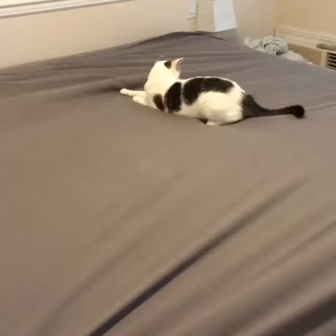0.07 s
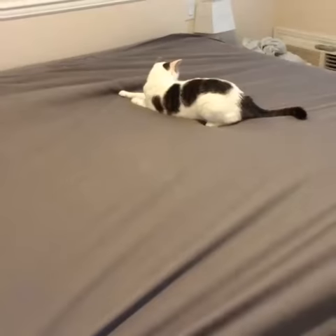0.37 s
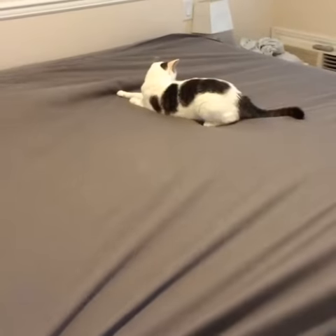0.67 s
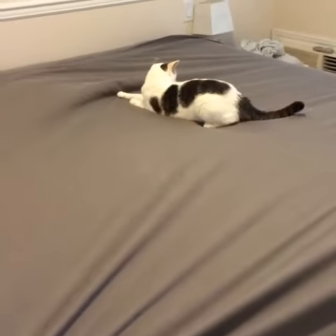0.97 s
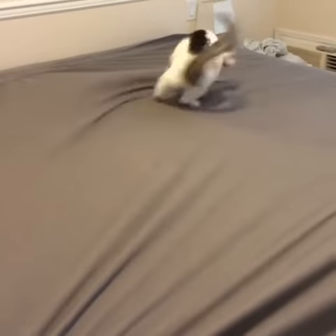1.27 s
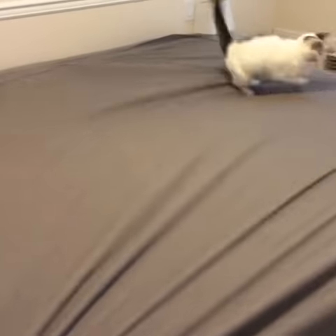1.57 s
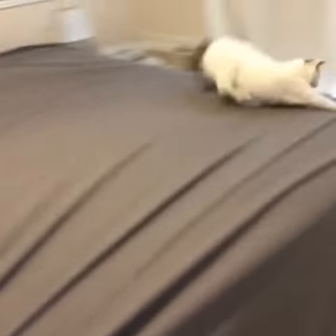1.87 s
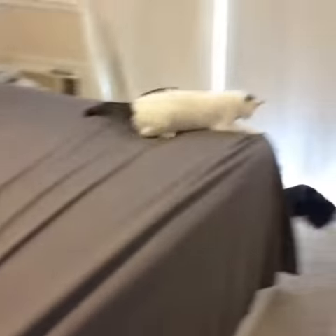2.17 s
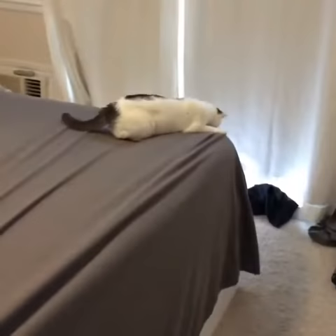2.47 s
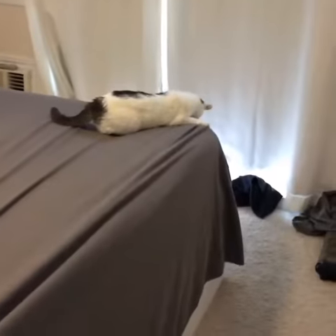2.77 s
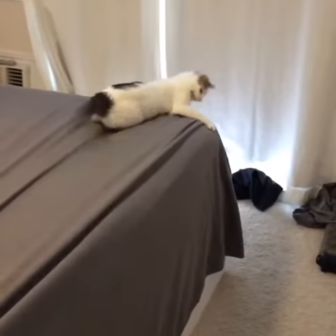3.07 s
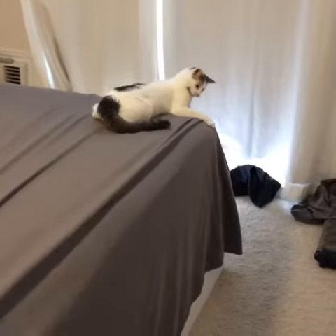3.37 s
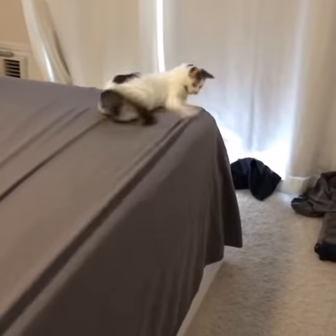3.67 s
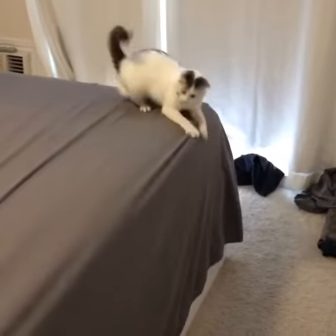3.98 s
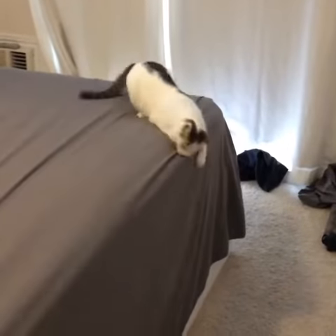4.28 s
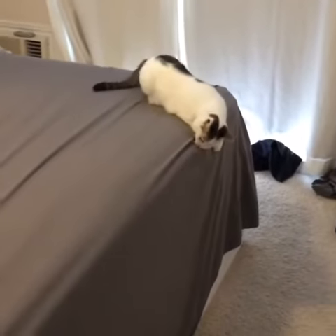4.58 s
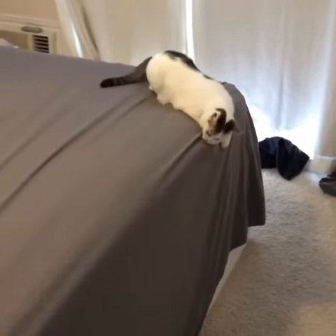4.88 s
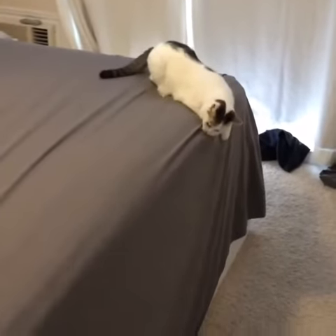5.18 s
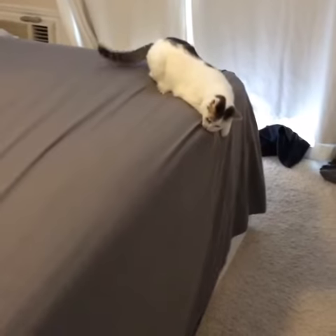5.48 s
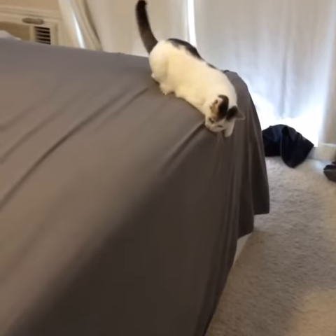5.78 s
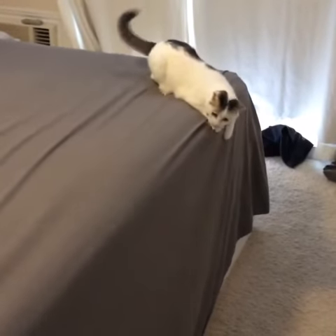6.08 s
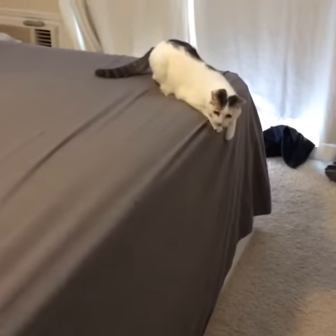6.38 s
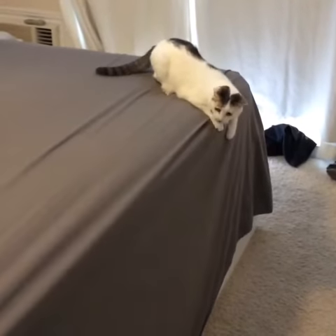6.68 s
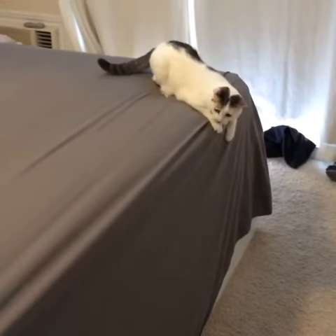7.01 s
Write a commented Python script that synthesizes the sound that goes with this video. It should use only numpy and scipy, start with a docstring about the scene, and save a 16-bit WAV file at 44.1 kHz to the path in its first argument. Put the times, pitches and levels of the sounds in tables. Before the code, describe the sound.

A ventilation fan hums steadily in a bedroom while a cat pounces across a bed with soft thumps and sheet rustles.

```python
"""A ventilation fan hums in a bedroom: motor drone, a wavering blade tone, duct rumble and rushing air.
A cat pounces across the bed; its paws pat the mattress, and fur and claws drag over the sheet.
One hand-held microphone turns from the wall to follow the cat, so the fan's colour shifts;
along the way it picks up a few soft low bumps."""
import sys
import numpy as np
from scipy import signal
from scipy.fft import rfft, irfft
from scipy.io import wavfile

SR = 44100
rng = np.random.default_rng(int(sys.argv[2]) if len(sys.argv) > 2 else 0)


def materialize(psi):
    """Save the field psi as 16-bit PCM at rate SR to the path in sys.argv[1].

    A 1-D psi becomes a single channel; in a 2-D psi each row is a channel.
    """
    bounded = np.clip(np.atleast_2d(psi).T, -1, 1)
    quanta = np.round(bounded * 32767).astype(np.int16)
    wavfile.write(sys.argv[1], SR, quanta)


N = 319725

# blade tone at the moving microphone: (time [s], rms level [dB])
BLADE_LEVEL = [(0.15, -48), (0.37, -42), (0.6, -46), (1.4, -48), (1.9, -46.5), (2.05, -52.5), (3.2, -51),
               (3.65, -49), (3.83, -53), (4.1, -49.5), (4.65, -49.5), (5.4, -52.5), (5.7, -51.5),
               (7.25, -51.5)]
# the motor hum sinks and comes back: (time [s], depth [dB, negative for a swell], half length [s])
HUM_DIPS = [(0.69, 2.5, .06), (1.42, -4, 0.12), (1.815, 22, 0.026), (2.848, 13, 0.077), (3.8, 11, 0.05),
            (4.54, 9, 0.076), (4.87, 12, .035), (5.33, 9, 0.082), (6.63, 10, 0.046), (6.97, 18, 0.22)]
# weaker fan tones: (frequency [Hz], rms level turned away [dB], waver [0-1], gain facing the wall [dB])
FAN_TONES = [(117.5, -67.5, 0.26, 14), (152.9, -59, 0.7, 0), (177.3, -58.5, 0.52, 1), (179.9, -63, 0.75, 6),
             (201, -78.5, 0.8, 10), (236.7, -76, 0, 6), (250.5, -66, 1, -9.5), (288.3, -74.5, 0.8, 2),
             (337, -72.5, 0.3, -9), (350.2, -72, 0.44, 1), (358.2, -70, 0.4, 1), (584, -71.5, 0.9, 1.5)]
# rumble of the duct: (frequency [Hz], level [dB per Hz])
DUCT_RUMBLE = [(20, -84), (36, -79), (52, -74.5), (88, -68.5), (128, -80), (155, -67.5), (182, -73),
               (220, -83.5), (370, -82.5), (440, -79), (505, -93.5), (680, -92.5), (1000, -102),
               (2500, -125)]


def fan(motor_hz=58.87, blade_hz=163.9, motor_db=-47.5, motor_wall_gain_db=-2):
    """Motor and blades drone over the duct's rumble; neighbouring tones beat with the blade tone."""
    facing = mic_facing()
    dips_db = sum(depth_db * swell(at, half) for at, depth_db, half in HUM_DIPS)
    motor_gain = from_db(motor_db + motor_wall_gain_db * facing - dips_db)
    motor = motor_gain * tone(motor_hz, waver=0.29, rate_hz=6.8)
    blades = from_db(curve(BLADE_LEVEL)) * tone(blade_hz, waver=0.6, rate_hz=18)
    weak_tones = sum(from_db(db + wall_gain_db * facing) * tone(hz, waver, rate_hz=4.8)
                     for hz, db, waver, wall_gain_db in FAN_TONES)
    return motor + blades + weak_tones + colour(white(), DUCT_RUMBLE)


# rush of air at the grille: (frequency [Hz], level [dB per Hz])
AIR_RUSH = [(200, -112), (600, -98.5), (1200, -92.5), (1750, -93.5), (2550, -97), (3400, -99), (4800, -99),
            (7100, -99.3), (8200, -103.3), (10000, -107.5), (12500, -112.5), (15300, -115)]
# resonances of the vent, heard from two directions:
# (frequency [Hz], width [Hz], level facing the wall [dB per Hz], level turned away [dB per Hz])
VENT_RESONANCES = [(423, 51, -90.5, -82.5), (526, 21, -100, -99), (670, 47, -84, -89.5),
                   (757, 51, -88, -89.5), (938, 22, -87.5, -90.5), (1073, 45, -91.5, -93),
                   (1156, 21, -92, -94.5), (1272, 53, -89.5, -93), (1354, 15, -104, -89),
                   (1468, 64, -93.5, -90.5), (1533, 49, -94.5, -98.5), (1670, 32, -100, -91),
                   (1844, 60, -89, -95), (1984, 48, -103, -89), (2100, 82, -82, -99),
                   (2205, 100, -90, -106), (2370, 60, -91, -91.5), (2630, 90, -88, -100),
                   (2843, 76, -94.5, -91), (3020, 173, -92, -95), (3700, 310, -94, -103),
                   (3984, 340, -103, -95.5), (4430, 85, -103, -101), (4700, 240, -99, -110),
                   (5350, 110, -108, -102), (5600, 140, -103, -103), (6380, 420, -105, -106),
                   (10500, 2500, -113, -126)]


def airflow(split_hz=1800, treble_wall_gain_db=3.5, waver_db=2.0):
    """Air hisses through the grille and rings in the vent, brighter with the microphone facing the wall."""
    facing = mic_facing()
    rush = colour(white(), AIR_RUSH)
    body = low_pass(rush, split_hz, order=1)
    treble = wall_reflections(rush - body, facing) * from_db(treble_wall_gain_db * facing)
    rings = np.zeros(N)
    for hz, width_hz, wall_db, away_db in VENT_RESONANCES:
        ring_db = away_db + (wall_db - away_db) * facing + waver_db * drift(rate_hz=3)
        rings += from_db(ring_db) * resonance(white(), hz, width_hz)
    return body + treble + rings


# paws landing on the bed, rms levels at the top of each pat:
# (time [s], puff level [dB], time to fade by 60 dB [s], puff dull above [Hz], thud level [dB])
PAW_LANDINGS = [(1.384, -50.5, 0.3, 1400, -57), (1.648, -43.5, 0.084, 2290, -41.5),
                (1.664, -46, 0.092, 1300, -52), (2.223, -48.5, 0.082, 1700, -54),
                (3.826, -45, 0.12, 1250, -43.5), (4.026, -43.5, 0.064, 1180, -40),
                (4.193, -47, 0.13, 1200, -44)]
# puff of the bedding before it is dulled: (frequency [Hz], relative level [dB])
BEDDING_PUFF = [(60, -30), (200, 6), (400, -1), (800, 3), (1500, 1), (4000, 3), (15000, -23)]
# round thud of the mattress: (frequency [Hz], relative level [dB])
MATTRESS_THUD = [(60, -32), (130, -8), (220, -5), (340, -5.5), (520, -9.5), (900, -37), (2000, -49)]


def paws(rise_share=0.029):
    """A paw presses a dull puff from the bedding and a thud from the mattress; both fade in the room."""
    puff = colour(white(), BEDDING_PUFF)
    thud = rms_one(colour(white(), MATTRESS_THUD))
    out = np.zeros(N)
    for at, puff_db, t60, dull_hz, thud_db in PAW_LANDINGS:
        age = seconds() - at
        rise = age / (rise_share * t60)  # a slow press also dies slowly
        decay = -np.log(1000) * age / t60
        envelope = np.exp(np.maximum(np.minimum(rise, decay), -60))
        dull_puff = rms_one(low_pass(puff, dull_hz, order=4))
        out += envelope * (from_db(puff_db) * dull_puff + from_db(thud_db) * thud)
    return out


# fur and claws sliding on the sheet, rms levels at the top of each stroke:
# (time [s], swish level [dB], half length [s], rub level [dB], claw level [dB])
SHEET_STROKES = [(0.46, -70, .025, -70, -67), (0.78, -69, 0.066, -70, -70), (1.06, -77, 0.066, -68, -72),
                 (1.353, -75, 0.068, -56, -66), (1.6, -76.5, .025, -73, -65), (1.65, -66, 0.012, -62, -62),
                 (1.672, -62, 0.014, -55, -80), (1.936, -78, 0.11, -56, -73), (2.55, -71, 0.02, -63, -70),
                 (2.86, -82, .016, -75, -70), (3.218, -74, 0.09, -60, -74), (3.793, -74, .025, -57, -71),
                 (3.84, -64, 0.034, -54, -76), (3.927, -67, .05, -57.5, -73),
                 (3.99, -61.5, 0.033, -56, -72), (4.077, -70, .04, -58, -78), (4.175, -65, 0.027, -58, -73),
                 (4.235, -70, .035, -59, -80), (4.86, -64, .022, -70, -66), (5.35, -65.5, 0.26, -68, -75)]
# swish of the sheet: (frequency [Hz], relative level [dB])
SHEET_SWISH = [(300, -4), (1000, -1), (3500, 10.5), (7000, 7), (11000, -5), (14000, -9), (16000, -9)]
# rub of the bedding under the cat's weight: (frequency [Hz], relative level [dB])
BEDDING_RUB = [(120, 0), (280, 3.5), (480, 2.5), (700, -2.5), (1000, -8), (2200, -14.5), (5000, -27)]
# fine hiss of claws on the weave: (frequency [Hz], relative level [dB])
CLAW_HISS = [(2000, -30), (7000, -12), (10000, -0.5), (13000, -3), (16000, -2.5)]
# short scrapes over the cloth: (time [s], top rms level [dB], half length [s], pitch [Hz])
CLAW_SCRAPES = [(1.385, -52, 0.03, 1300), (1.654, -56, 0.0084, 1670), (1.92, -61.5, 0.085, 2000),
                (2.043, -60, .016, 2200), (2.26, -64, .03, 1900), (2.765, -62.5, 0.056, 1750),
                (3.156, -61.5, 0.033, 1200), (3.937, -61, 0.0086, 2200), (4.195, -59, .016, 1700)]
# colour of a scrape: (frequency [multiple of its pitch], relative level [dB])
SCRAPE_COLOUR = [(.24, -21), (.57, -4), (1, -4), (1.4, -4), (1.9, -23), (3.8, -44)]


def sheet():
    """Countless threads slip in an uneven brush over a dull rub; claws add hiss and short scrapes."""
    slips = white() * from_db(1.5 * drift(rate_hz=90))
    catches = white() * from_db(2.5 * drift(rate_hz=150))
    swish = rms_one(colour(slips, SHEET_SWISH))
    rub = rms_one(colour(white(), BEDDING_RUB))
    claw = rms_one(colour(catches, CLAW_HISS))
    out = np.zeros(N)
    for at, db, half, hz in CLAW_SCRAPES:
        spectrum = [(hz * multiple, level_db) for multiple, level_db in SCRAPE_COLOUR]
        out += from_db(db) * swell(at, half) * rms_one(colour(catches, spectrum))
    for at, swish_db, half, rub_db, claw_db in SHEET_STROKES:
        stroke = from_db(swish_db) * swish + from_db(rub_db) * rub + from_db(claw_db) * claw
        out += swell(at, half) * stroke
    return out


# soft low bumps at the microphone: (time [s], peak level [dB])
LOW_BUMPS = [(0.564, -35.5), (0.602, -34.5), (1.29, -32.5), (1.425, -46), (1.499, -34), (1.633, -36),
             (4.765, -30), (6.454, -35)]


def bumps(hz=88, half_length_cycles=0.68):
    """Each bump reaches the microphone as one soft push of air with a rebound on either side."""
    out = np.zeros(N)
    for at, db in LOW_BUMPS:
        cycles = (seconds() - at) * hz
        envelope = np.exp(-np.minimum((cycles / half_length_cycles) ** 2, 60))
        out += from_db(db) * envelope * np.cos(2 * np.pi * cycles)
    return out


# hiss off wall and window, on paths under a metre longer than the direct one:
# (delay turned away [s], delay facing the wall [s], gain [dB])
REFLECTIONS = [(.00073, 0.0015, -25), (.00205, .0027, -18)]


def wall_reflections(hiss, facing, sway_s=0.00003):
    """Faint early reflections comb the hiss; their paths change as the microphone turns and sways."""
    t, out = seconds(), hiss.copy()
    for away_s, wall_s, db in REFLECTIONS:
        delay = away_s + (wall_s - away_s) * facing + sway_s * drift(rate_hz=0.5)
        out += from_db(db) * np.interp(t - delay, t, hiss)
    return out


# where the microphone points: (time [s], direction [1 facing the wall, 0 turned away])
MIC_DIRECTION = [(0, 0.71), (1.9, 0.66), (2.4, 0.14), (3, 0.13), (4.6, 0.035), (7.25, 0)]


def mic_facing():
    """The hand turns the microphone away from the wall, after the cat."""
    return curve(MIC_DIRECTION)


def tone(hz, waver, rate_hz):
    """A sine of rms 1 whose level and phase are stirred by uneven airflow."""
    stir = 1 + waver * (drift(rate_hz) + 1j * drift(rate_hz)) / np.sqrt(2)
    phase = 2 * np.pi * (hz * seconds() + rng.random())
    return rms_one(np.real(stir * np.exp(1j * phase)))


def resonance(x, hz, width_hz):
    """A two-pole resonance with gain 1 on top."""
    radius = np.exp(-np.pi * width_hz / SR)
    feedforward = np.array([1, 0, -1]) * (1 - radius ** 2) / 2
    feedback = [1, -2 * radius * np.cos(2 * np.pi * hz / SR), radius ** 2]
    return signal.lfilter(feedforward, feedback, x)


def low_pass(x, hz, order):
    return signal.sosfilt(signal.butter(order, hz, fs=SR, output="sos"), x)


def colour(x, spectrum):
    """Shape a sound by rows of (frequency [Hz], gain [dB])."""
    hz, db = np.transpose(spectrum)
    gain_db = np.interp(np.log(bin_hz() + 1e-9), np.log(hz), db)
    return irfft(rfft(x) * from_db(gain_db), N)


def white():
    """Noise at 0 dB per Hz."""
    return rng.standard_normal(N) * np.sqrt(SR / 2)


def drift(rate_hz):
    """A random wander of rms 1, changing about rate_hz times a second."""
    return rms_one(irfft(rfft(white()) / (1 + (bin_hz() / rate_hz) ** 2), N))


def swell(at, half):
    """A bell curve of height 1 around a moment; the half length is its standard deviation."""
    return np.exp(-np.minimum(((seconds() - at) / half) ** 2 / 2, 60))


def curve(rows):
    """Join rows of (time [s], value) by straight lines."""
    return np.interp(seconds(), *np.transpose(rows))


def seconds():
    return np.arange(N) / SR


def bin_hz():
    return np.arange(N // 2 + 1) * SR / N


def from_db(db):
    return 10 ** (np.asarray(db) / 20)


def rms_one(x):
    return x / np.sqrt(np.mean(x ** 2) + 1e-20)


def scene():
    """Fan and cat share the bedroom; one microphone feeds both channels."""
    room = fan() + airflow() + bumps() + paws() + sheet()
    return np.array([room, room])


def record(dry):
    """The microphone opens after a moment; the top is cut steeply."""
    opens_s, cutoff_hz = 0.12, 15250
    opened = dry * (seconds() >= opens_s)
    top_cut = signal.ellip(12, 0.1, 80, cutoff_hz, fs=SR, output="sos")
    return signal.sosfilt(top_cut, opened)


dry = scene()
out = record(dry)
materialize(out)
```